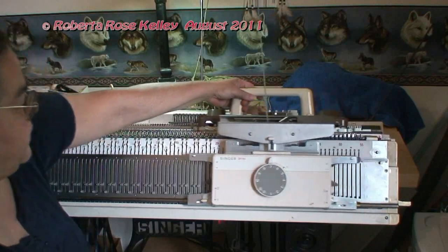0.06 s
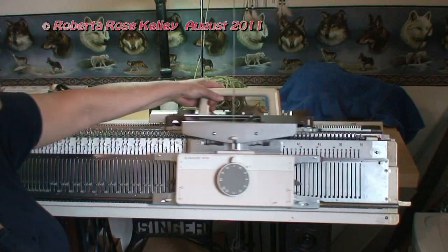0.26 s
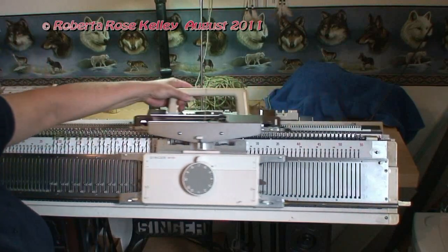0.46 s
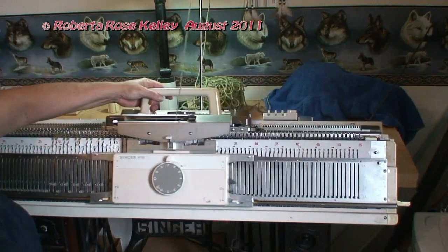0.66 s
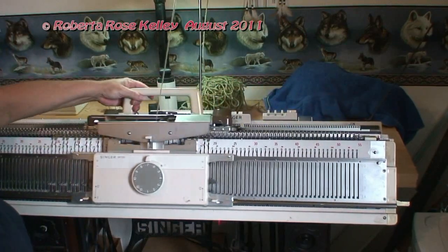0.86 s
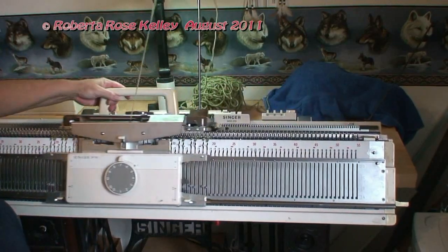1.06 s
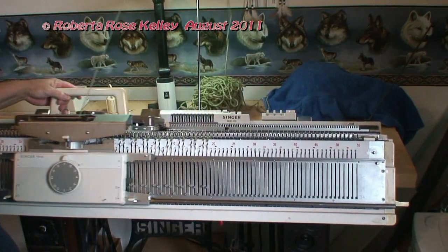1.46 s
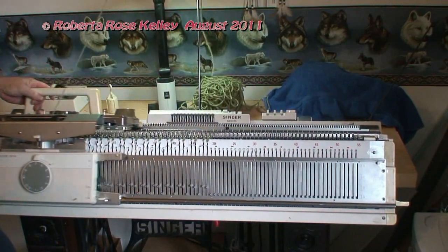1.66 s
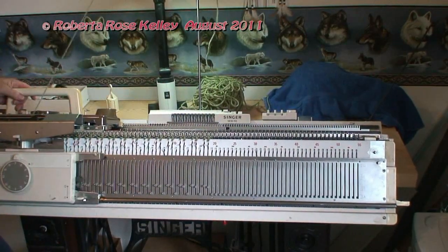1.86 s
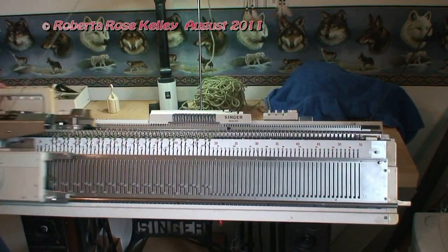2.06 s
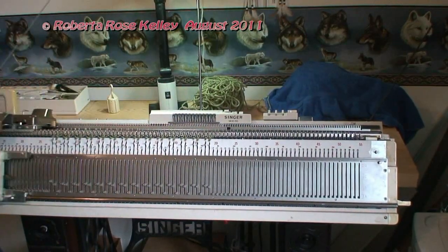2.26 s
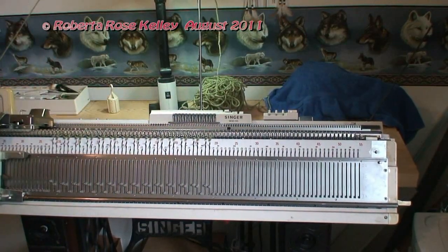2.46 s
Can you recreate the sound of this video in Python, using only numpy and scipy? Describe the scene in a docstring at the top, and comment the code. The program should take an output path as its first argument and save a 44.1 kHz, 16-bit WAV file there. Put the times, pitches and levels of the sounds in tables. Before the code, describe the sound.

A knitting machine carriage is pushed once along its steel needle bed, close by in a small quiet room. It rattles densely with sharp clacks over a hollow drone, then clacks twice and stops with a thump.

```python
"""Knitting machine, one stroke

A carriage is pushed along its steel needle bed, close by in a small quiet room. Its cams rake the
needles in a dense rattle with sharper clacks and latch pings, while the case drones, the rail squeaks
and the table rumbles. It clears the needles, clacks twice at the end of the bed and stops with a thump."""
import sys
import numpy as np
from scipy import signal
from scipy.fft import rfft, irfft, next_fast_len
from scipy.io import wavfile
from scipy.ndimage import uniform_filter1d

SR = 44100
rng = np.random.default_rng(int(sys.argv[2]) if len(sys.argv) > 2 else 0)


def generate_wav(signal):
    """Clip the signal to [-1, 1] and save it as 16-bit WAV at the path in sys.argv[1]."""
    frames = np.transpose(np.atleast_2d(signal))
    scaled = np.clip(frames, -1, 1) * 32767
    pcm = np.round(scaled).astype(np.int16)
    wavfile.write(sys.argv[1], SR, pcm)


N = 114660


def amp(db):
    """Decibels to gain."""
    return 10 ** (np.asarray(db) / 20)


def unit(x):
    """Scale to rms 1."""
    return x / np.sqrt(np.mean(x ** 2) + 1e-20)


def along(points, hz):
    """Read (Hz, value) points on a log frequency axis."""
    f, values = np.transpose(points)
    return np.interp(np.log(hz + 1e-6), np.log(f), values)


def curve(points):
    """An automation curve through (seconds, value) points, one value per sample."""
    return np.interp(np.arange(N) / SR, *np.transpose(points))


def colour(points, hz=1):
    """An EQ curve: gain against frequency, from (Hz or multiple of hz, dB) points."""
    return lambda f: amp(along(points, f / hz))


def noise(response, size=N):
    """Stereo noise of rms 1 with the given response and the room's width."""
    # Each row: frequency in Hz, correlation of left and right.
    likeness = [(30, 0.94), (250, 0.85), (700, 0.82), (2500, 0.72), (5500, 0.64), (8000, 0.38),
                (12500, 0.49), (16000, 0.94)]
    f = np.fft.rfftfreq(size, 1 / SR)
    spread = np.arccos(along(likeness, f)) / 2
    spectra = rfft(rng.standard_normal((2, size))) * response(f)
    mid, side = irfft(spectra * [np.cos(spread), np.sin(spread)], size)
    return unit(np.array([mid + side, mid - side]))


def strike(out, start, db, response, rise_s, t60):
    """Mix in one blow: a dense cluster of modes swells, chatters, dies and leaves a duller room tail."""
    # Soft furnishings dull the tail. Each row: frequency in Hz, gain in dB.
    room_eq = [(300, 1.5), (2000, -4), (6000, 1), (10000, -8), (16000, -32)]
    chatter_s = 0.0071
    room_build_s, room_t60, room_db = 0.0099, 0.35, -8.5
    t = np.arange(12288) / SR
    f = np.fft.rfftfreq(len(t), 1 / SR)
    gain = response(f)
    dulled = gain * colour(room_eq)(f)
    direct = noise(lambda _: gain, len(t))
    reverb = noise(lambda _: dulled, len(t)) * np.sqrt(np.sum(dulled ** 2) / np.sum(gain ** 2))
    attack = 1 - np.exp(-(t / rise_s) ** 2)
    decay = amp(-60 * np.maximum(t - chatter_s, 0) / t60)
    tail = (1 - np.exp(-t / room_build_s)) * amp(room_db - 60 * t / room_t60)
    blow = amp(db) * (attack * decay * direct + tail * reverb)
    slot = out[:, round(start * SR):][:, :len(t)]
    slot += blow[:, :slot.shape[1]]


def steel_bed():
    """The ring of the needle bed as an EQ curve: a few strong modes among many lesser ones."""
    # Each row: mode frequency in Hz, width in Hz, lift in dB.
    modes = [(1107, 50, -3), (1230, 26, 7.5), (1340, 89, 6), (1590, 24, 5), (2082, 32, 3.5),
             (2214, 48, 1.5), (2548, 78, 2.5), (3080, 62, 1), (3470, 200, 0), (3760, 60, 5.5),
             (5420, 70, 3), (6300, 70, 6.5), (6520, 62, -1)]
    lesser_spacing_hz, lesser_depth_db = 21.76, 2.3
    ripple = rng.standard_normal(4096)

    def response(f):
        strong = sum(db / (1 + (2 * (f - hz) / width) ** 2) for hz, width, db in modes)
        lesser = lesser_depth_db * np.interp(f / lesser_spacing_hz, np.arange(len(ripple)), ripple)
        return amp(strong + lesser)
    return response


def room_air():
    """The faint, steady hush of a small room."""
    # Each row: frequency in Hz, gain in dB.
    air_eq = [(25, -2), (100, -10), (400, 0.5), (1500, -8), (6000, -22), (16000, -43)]
    return amp(-51) * noise(colour(air_eq))


def table_and_frame():
    """The push rocks the table and sets the machine's frame humming."""
    # Each row: time in seconds, rumble level in dB, hum level in dB before its trim.
    levels = [(0.0, -76, -49), (0.03, -63, -55.5), (0.44, -75, -52), (1.19, -44.5, -44.5),
              (1.27, -50, -41.5), (2.0, -42, -43), (2.03, -57, -44.5), (2.12, -42, -50), (2.26, -64, -43),
              (2.6, -66, -52.5)]
    # The table's deep rumble and the frame's low hum. Each row: frequency in Hz, gain in dB.
    table_eq = [(12, -25), (22, -1), (33, -6), (45, -11), (62, -18), (120, -44)]
    frame_eq = [(40, -20), (62, -10), (80, -3.5), (105, 4), (118, -3.5), (135, 3), (165, -6.5), (200, -7.5),
                (245, -1), (300, -12.5), (500, -33)]
    hum_trim_db = -1.5
    times, rumble_db, hum_db = np.transpose(levels)
    t = np.arange(N) / SR
    rumble = amp(np.interp(t, times, rumble_db)) * noise(colour(table_eq))
    hum = amp(np.interp(t, times, hum_db) + hum_trim_db) * noise(colour(frame_eq))
    return rumble + hum


def needle_rattle(bed):
    """The cams rake the needles: steel scraping with hundreds of tiny ticks a second on it."""
    # Each row: time in seconds, level in dB.
    rake_level = [(0, -68), (.03, -47), (.17, -44), (.22, -33), (.275, -31.5), (.33, -24), (.39, -24.5),
                  (.49, -20.5), (.66, -17.5), (.75, -22), (.82, -22), (.95, -21), (1.01, -24.5),
                  (1.06, -18), (1.25, -17), (1.4, -18), (1.6, -18.5), (1.74, -17.5), (1.79, -20),
                  (1.88, -24), (1.96, -28), (2.02, -39), (2.055, -42.5), (2.08, -31.5), (2.19, -25),
                  (2.24, -38), (2.3, -49), (2.37, -45.5), (2.48, -60), (2.6, -54.5)]
    # Needle colour early and late in the stroke. Each row: frequency in Hz, gain in dB.
    early_eq = [(300, -22), (900, -11), (1500, -3.5), (2200, 0.5), (3000, -2), (4800, 1), (6400, 3.5),
                (8500, -2), (10000, -4), (12300, -2), (14000, -9.5), (16000, -8.5)]
    late_eq = [(300, -53), (900, -5), (1300, -1), (2200, 0.5), (3000, 1), (4800, 2.5), (6200, 4.5),
               (8500, -0.5), (10000, -2), (12500, 0), (14000, -4), (16000, -17)]
    ticks_per_s, tick_t60, tick_spread_db, scrape_share = 200, 0.036, 4, 0.68
    fade_start_s, fade_end_s = 0.78, 1.55
    ticks = rng.random(N) < ticks_per_s / SR
    strength = amp(tick_spread_db * np.clip(rng.standard_normal(N), -2, 2))
    decay = amp(-60 / (tick_t60 * SR))
    tick_power = signal.lfilter([1], [1, -decay ** 2], ticks * strength ** 2)
    rattle = np.sqrt(scrape_share + (1 - scrape_share) * tick_power / tick_power.mean())
    early = noise(lambda f: colour(early_eq)(f) * bed(f))
    late = noise(lambda f: colour(late_eq)(f) * bed(f))
    crossfade = curve([(fade_start_s, 0), (fade_end_s, 1)])
    steel = np.sqrt(1 - crossfade) * early + np.sqrt(crossfade) * late
    return amp(curve(rake_level)) * rattle * steel


def case_drone():
    """Friction on the rail drives the hollow resonances of case and bed."""
    # Each row: time in seconds, level in dB.
    slide_level = [(0, -48), (.06, -44.5), (.09, -40), (.18, -37.5), (.27, -29.5), (.33, -27.5), (.55, -28),
                   (.68, -28.5), (.9, -31), (1.04, -33), (1.08, -26.5), (1.35, -27.5), (1.55, -29),
                   (1.78, -27.5), (1.96, -30.5), (2.04, -41), (2.1, -45), (2.14, -29), (2.25, -27),
                   (2.35, -34.5), (2.46, -49.5), (2.6, -63)]
    # Each row: resonance in Hz, nominal width in Hz, relative level in dB.
    modes = [(238, 24, -12), (335, 44, -9.5), (430.5, 9.9, -3), (486.6, 7.3, -1), (562, 20.4, 0.5),
             (630, 23, -1.5), (707, 30, -2.5), (774, 16.6, 7), (935, 50, -4.5), (997, 44, -3.5),
             (1128, 39, -0.5), (1262, 27, -4), (1417, 76, -7.5)]
    # A broad wash around the resonances. Each row: frequency in Hz, gain in dB.
    wash_eq = [(80, -53), (200, -10.5), (400, -6), (650, 8.5), (1000, -14.5), (2000, -8.5), (5000, -40)]

    def body(f):
        peaks = [amp(db) / (1 + ((f - hz) / (0.94 * width)) ** 2) for hz, width, db in modes]
        return np.sqrt(sum(peak ** 2 for peak in peaks))
    return amp(curve(slide_level)) * unit(noise(body) + noise(colour(wash_eq)))


def cam_clacks(bed):
    """Needle butts strike the cams: each knocks the carriage and snaps in the treble."""
    # Each row: start in seconds, knock and snap levels in dB before their trims, knock t60 in seconds.
    hits = [(0.0214, -46, -42.5, 0.049), (.064, -36.5, -44, .06), (0.092, -46, -44, 0.055),
            (0.123, -41, -38.5, 0.052), (0.195, -50, -37, .07), (0.235, -46, -36, 0.028),
            (0.2776, -26.5, -31, 0.096), (0.3109, -17, -21, 0.068), (0.5036, -22, -19.5, 0.09),
            (0.5278, -21, -23, 0.054), (0.5781, -20, -21.5, 0.047), (.6004, -21, -24, .07),
            (.6474, -24, -20.5, 0.17), (0.7138, -22, -24, 0.029), (0.7596, -19.5, -18.5, 0.081),
            (.8376, -18, -19.5, 0.057), (0.8885, -20.5, -21, 0.045), (0.9668, -20, -21, .06),
            (1.015, -22, -19, 0.074), (1.077, -23, -21, 0.048), (1.114, -22, -23, 0.044),
            (1.1647, -27, -21, .09), (1.2003, -27, -19, 0.052), (1.2505, -20, -24, .06),
            (1.2855, -21, -22.5, 0.1), (1.3356, -18, -20.5, 0.085), (1.4247, -20.5, -22.5, .08),
            (1.4644, -40, -20, 0.053), (1.5517, -20, -19.5, 0.051), (1.6069, -24, -21, 0.036),
            (1.6356, -29, -24, 0.047), (1.69, -27, -20.5, 0.053), (1.716, -23.5, -25, .08),
            (1.9058, -27, -28, 0.13), (1.9372, -31, -24.5, .07), (2.062, -32.5, -32.5, .09),
            (2.1382, -17, -27, 0.038), (2.17, -26, -29, 0.075), (2.1786, -13.5, -23, .045),
            (2.2715, -31, -48, 0.036), (2.3058, -32, -47, 0.035)]
    # The knock's body and the snap's bright edge. Each row: frequency in Hz, gain in dB.
    knock_eq = [(300, -17.5), (800, 3.5), (1400, 1), (2300, 8), (3200, 4), (5000, 0), (8000, 5.5),
                (16000, -49)]
    snap_eq = [(1000, -13), (4000, 3.5), (7000, 7), (9500, 0.5), (12500, 9), (14000, -3.5), (16000, -2.5)]
    knock_trim_db, snap_trim_db = -2.5, 2.5
    ringing = 1.18  # a knock brings out the bed's modes more than scraping does
    knock = lambda f: colour(knock_eq)(f) * bed(f) ** ringing
    out = np.zeros((2, N))
    for start, knock_db, snap_db, t60 in hits:
        strike(out, start, knock_db + knock_trim_db, knock, rise_s=0.0006, t60=t60)
        strike(out, start, snap_db + snap_trim_db, colour(snap_eq), rise_s=0.00084, t60=2.17 * t60)
    return out


def squeaks_and_case_tones():
    """Rail and bed sing under the carriage as friction locks on to one narrow resonance for a moment. Late in
    the stroke the case also sounds two narrow low-mid resonances, near 440 Hz and 1237 Hz."""
    # Each row: start and end in seconds, pitch in Hz, width in Hz, level in dB.
    squeaks = [(0.078, 0.318, 315, 26, -45), (0.06, 0.3, 652, 19, -38.5), (0.436, 0.572, 690, 11, -28.5),
               (1.742, 1.985, 440, 25, -40.5), (1.66, 2, 1237, 140, -35), (2.05, 2.132, 5070, 200, -36.5)]
    fade_s, steadiness = 0.026, 0.2  # steadiness: share of the random swell that friction evens out
    t = np.arange(N) / SR
    out = np.zeros((2, N))
    for start, end, hz, width, db in squeaks:
        tone = noise(lambda f: 1 / (1 + (2 * (f - hz) / width) ** 2))
        power = uniform_filter1d((tone ** 2).mean(0), size=512)
        swell = np.sqrt(np.abs(power) + 1e-4)
        gate = np.clip(np.minimum(t - start, end - t) / fade_s, 0, 1)
        out += amp(db) * gate * unit(tone / swell ** steadiness)
    return out


def latch_pings(bed):
    """Struck needles and latches ring briefly, coloured by the steel bed."""
    # Each row: start in seconds, level in dB, pitch in Hz, t60 in seconds.
    pings = [(.064, -41, 1760, .07), (.171, -43, 5150, .09), (.2345, -19, 6620, 0.0083),
             (0.249, -23, 6440, .07), (0.305, -17, 6700, 0.02), (.533, -18.5, 6450, .05),
             (.580, -15.5, 6430, 0.054), (.603, -22, 6300, .05), (.655, -18.5, 6840, .05),
             (.720, -16.5, 6960, 0.041), (.763, -21, 6500, 0.052), (.838, -25, 1800, 0.045),
             (.893, -17, 6450, 0.042), (.970, -23, 6550, 0.055), (1.08, -14, 5860, 0.033),
             (1.116, -21, 6230, .04), (1.251, -20, 2550, .05), (1.286, -21, 2460, .05),
             (1.293, -24, 6430, .04), (1.337, -22, 5700, .04), (1.370, -19.5, 6470, .06),
             (1.716, -22, 4660, .12), (2.139, -22, 7200, .04)]
    # One narrow peak. Each row: multiple of the pitch, gain in dB.
    ping_eq = [(.5, -71), (.8, -23), (.93, -3.5), (1, -1.5), (1.07, -10), (1.25, -30.5), (2, -54)]
    out = np.zeros((2, N))
    for start, db, hz, t60 in pings:
        strike(out, start, db, lambda f: colour(ping_eq, hz)(f) * bed(f), rise_s=0.0013, t60=t60)
    return out


def carriage_thumps():
    """The whole carriage jolts as it meets the needles and as it stops."""
    # Each row: start in seconds, level in dB, pitch in Hz.
    jolts = [(.313, -19, 968), (2.181, -23, 1300), (2.19, -30, 680), (2.256, -27, 680), (2.276, -20.5, 567),
             (2.306, -25, 544)]
    # A boxy peak with wide skirts. Each row: multiple of the pitch, gain in dB.
    thump_eq = [(.1, -37), (.4, -13), (.75, -11.5), (1, 0.5), (1.3, -13.5), (2, -18), (5, -27), (12, -29),
                (25, -60.5)]
    out = np.zeros((2, N))
    for start, db, hz in jolts:
        strike(out, start, db, colour(thump_eq, hz), rise_s=0.0024, t60=0.17)
    return out


def scene():
    """The carriage drifts to the left over a rumbling table and quiet room air."""
    # Each row: time in seconds, left minus right in dB.
    pan = [(0, -0.5), (.5, 0.6), (1.1, 1), (1.5, 1.1), (2, 1), (2.6, 3.5)]
    bed = steel_bed()
    carriage = needle_rattle(bed) + cam_clacks(bed) + latch_pings(bed)
    carriage += case_drone() + squeaks_and_case_tones() + carriage_thumps()
    carriage *= amp(curve(pan) * np.array([[0.5], [-0.5]]))
    return carriage + table_and_frame() + room_air()


def record(dry):
    """A brick-wall low-pass takes off the very top of the treble."""
    top_hz = 15750
    size = next_fast_len(N + SR // 2)
    passband = np.fft.rfftfreq(size, 1 / SR) < top_hz
    return irfft(rfft(dry, size) * passband, size)[:, :N]


dry = scene()
out = record(dry)
generate_wav(out)
```